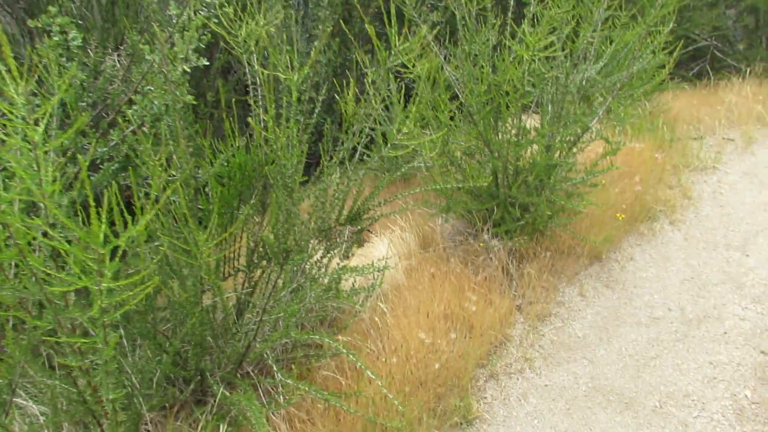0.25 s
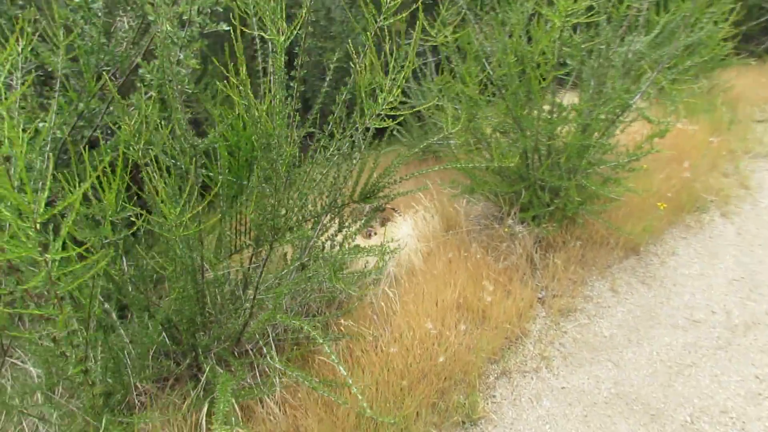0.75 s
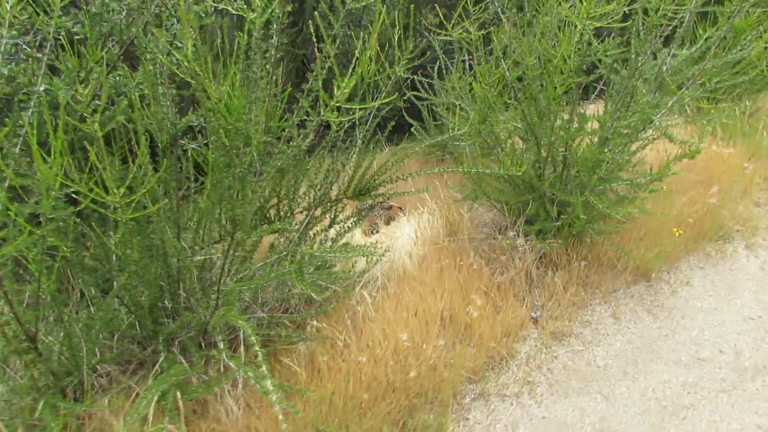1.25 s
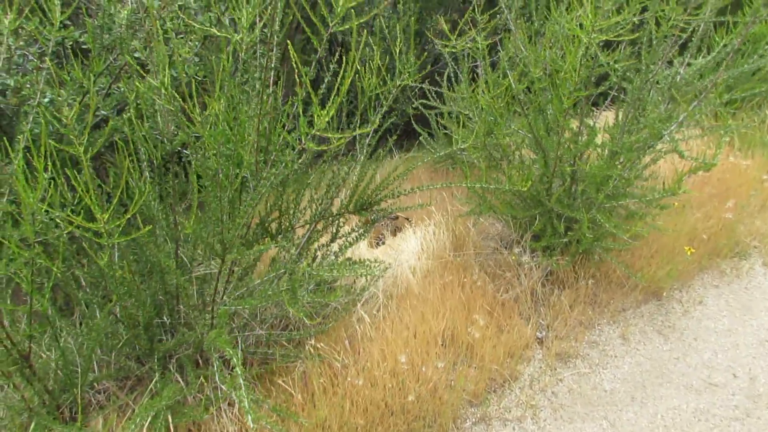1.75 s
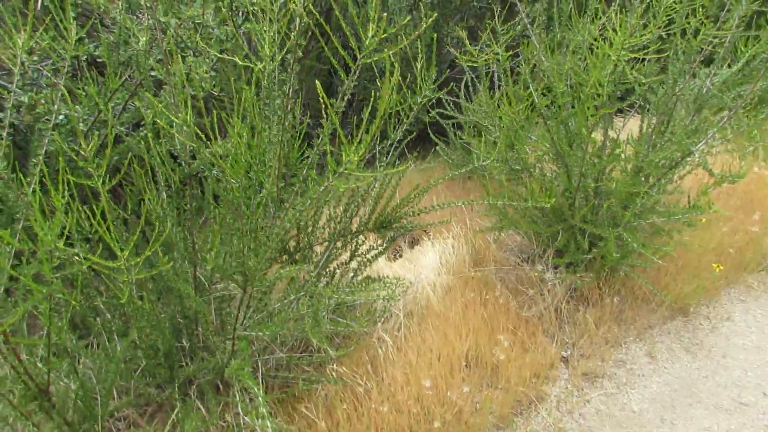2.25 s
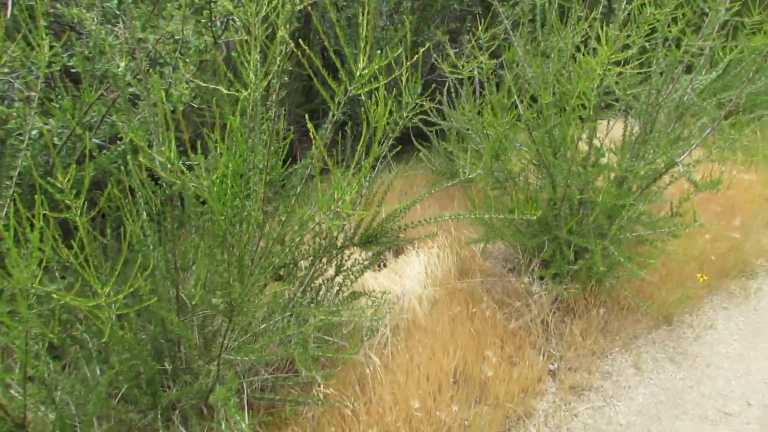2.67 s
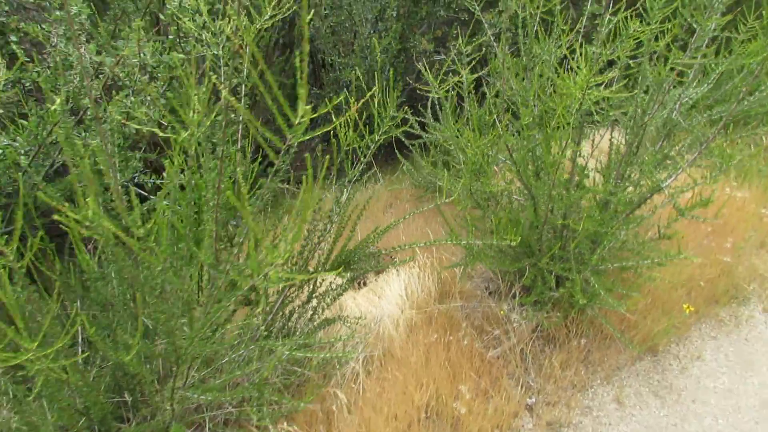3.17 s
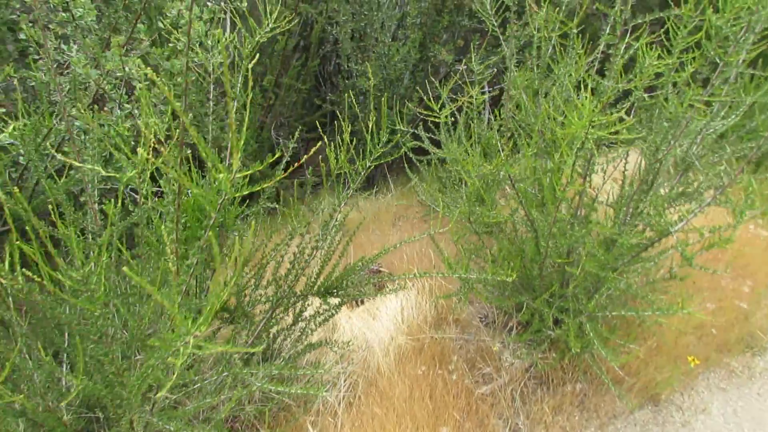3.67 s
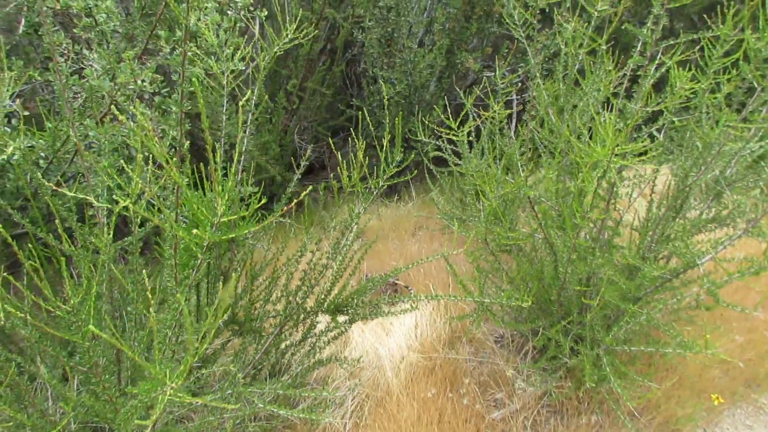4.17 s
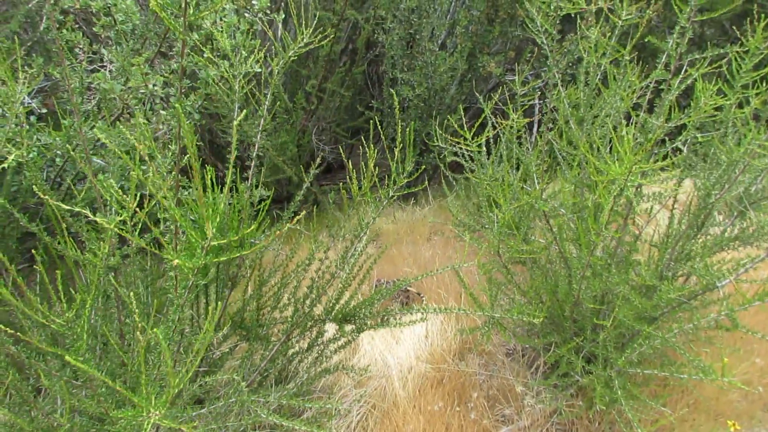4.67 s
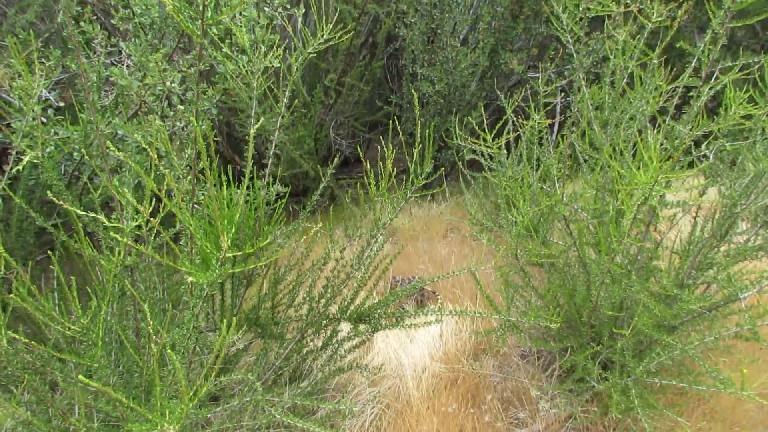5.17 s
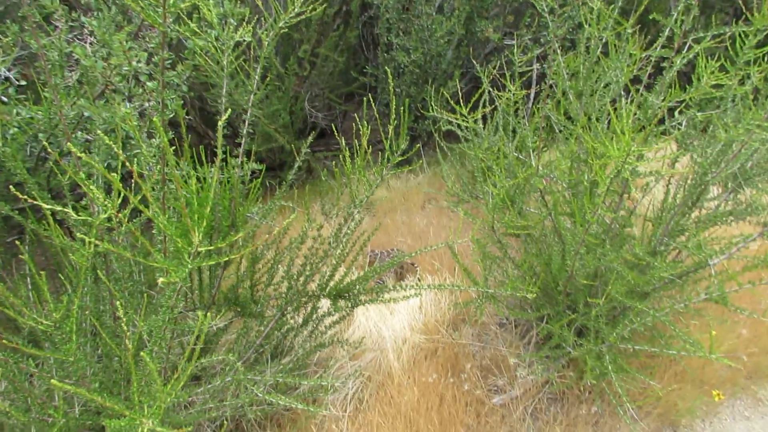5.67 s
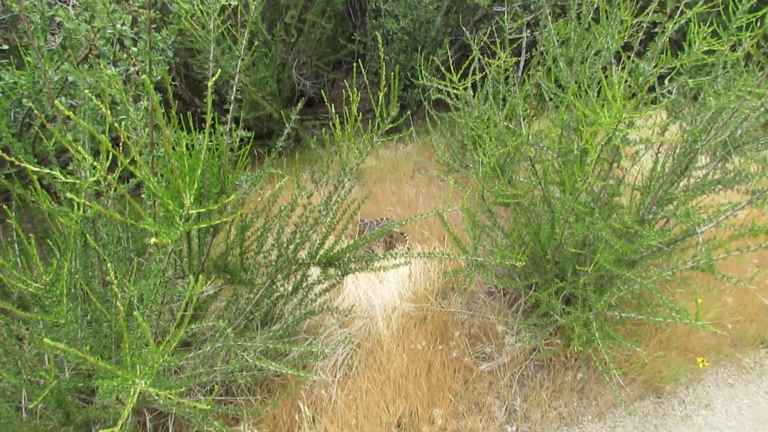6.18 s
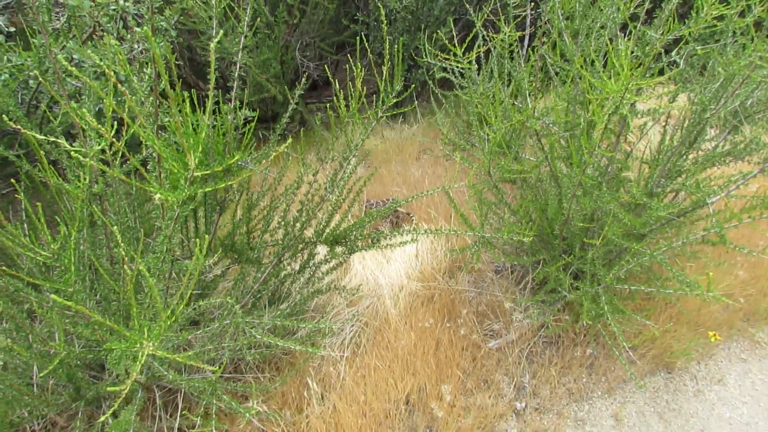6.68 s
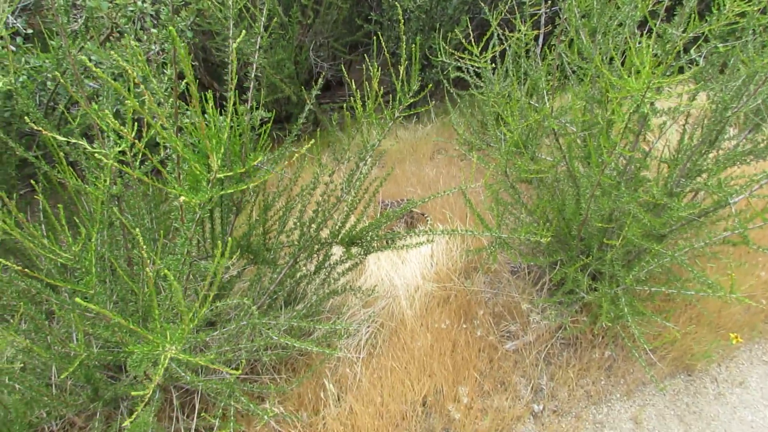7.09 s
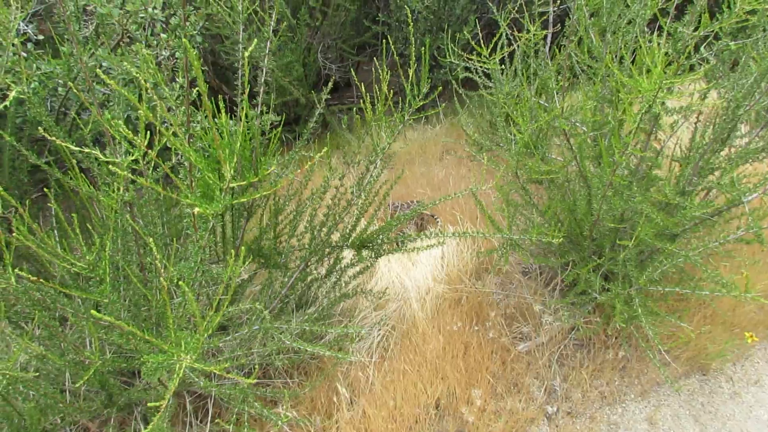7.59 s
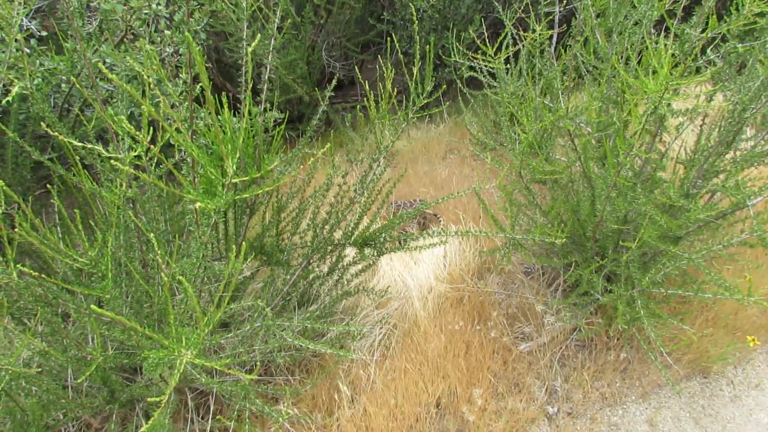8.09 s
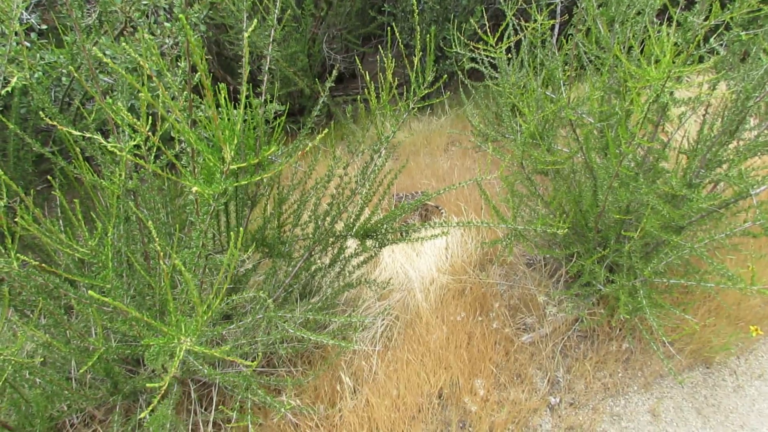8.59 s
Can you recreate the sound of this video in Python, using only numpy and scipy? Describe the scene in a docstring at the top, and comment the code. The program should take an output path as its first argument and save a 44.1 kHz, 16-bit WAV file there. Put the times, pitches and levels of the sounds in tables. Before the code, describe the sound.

The continuous dry, high buzz of a rattlesnake's tail over faint outdoor air, with a few quick clicks near the microphone.

```python
"""A rattlesnake buzzes its tail without a break in dry brush beside a track.
The tail swings some 56 times a second; at each turn the hollow segments clatter and ring.
Their colour brightens as the posture changes; brush, ground and stems scatter the sound.
A faint outdoor wash lies below. About 2 s in, a camera body clicks in the hand."""
import sys
import numpy as np
from scipy import signal
from scipy.fft import rfft, irfft
from scipy.io import wavfile

SR = 44100
rng = np.random.default_rng(int(sys.argv[2]) if len(sys.argv) > 2 else 0)


def unload_audio(sound):
    """Save the sound as a 16-bit wav file, at the path given as the first command line argument."""
    columns = np.transpose(np.atleast_2d(sound))
    # keep every value between -1 and 1, then stretch to whole-number steps
    steps = np.round(np.clip(columns, -1, 1) * 32767)
    wavfile.write(sys.argv[1], SR, steps.astype(np.int16))


N = 389403
TIME_S = np.arange(N) / SR
BIN_HZ = np.fft.rfftfreq(N, 1 / SR)

# The tail speeds up, then tires. Each row: time in seconds, full swings per second.
SWING_HZ = [(0, 55.3), (1.7, 57.1), (5.1, 56.3), (7.7, 54.3), (8.8, 53.9)]
# Rattling force surges as the snake shifts, then grows. Each row: time in seconds, relative level in dB.
FORCE_DB = [(0, -31.0), (3.1, -30.5), (3.3, -29.9), (3.7, -29.5), (4.0, -30), (5.1, -30), (6.3, -29),
            (8.83, -28.5)]
# Timing spread of the knocks. Each row: time in seconds, spread as a share of one stroke.
SCATTER_STROKES = [(0, .13), (.8, .23), (5.8, .27), (8.8, .13)]
# Ranges of large to small segments. Each entry: centre in Hz.
SEGMENT_CENTRES_HZ = [3000, 5670, 9200, 14400]
# Posture of the rattle. Each row: time in seconds, blend from 0 (first posture) to 1 (second).
POSTURE_BLEND = [(0, 0), (1.3, 0.14), (1.8, 0.26), (3.17, 0.56), (3.3, 0.65), (4.3, 0.96), (8.8, 1)]
# Segment resonances in each posture. Each row: centre in Hz, width in Hz, relative level in dB.
FIRST_MODES = [(2390, 240, -8.5), (3750, 680, -6), (4640, 870, 1), (6280, 880, -4.5), (7770, 1600, -6),
               (9500, 800, -5), (12440, 1800, -6.5), (14900, 690, -5)]
SECOND_MODES = [(2620, 820, -13.5), (3657, 704, -4.5), (4760, 450, -6), (6050, 810, 1), (6800, 1050, -3.5),
                (9300, 2000, -7.5), (12870, 1100, -4.5), (15800, 2100, -5.5)]
# Sharp shell rings in either posture. Each row: centre in Hz, width in Hz, relative level in dB.
SHELL_MODES = [(3810, 110, -10.5), (4720, 130, -7), (6217, 47, 1), (9300, 220, -6.5)]
# Cancellations in the second posture. Each row: centre in Hz, 1/e half-width in Hz, gain in dB.
SHELL_DIPS = [(4180, 180, -2), (8450, 490, -1), (14450, 280, -3)]
# Directional lobes. Each row: centre in Hz, 1/e half-width in Hz, posture (0-1), gain there in dB.
POSTURE_LOBES = [(2400, 630, 0.12, -4.5), (2500, 470, 0.53, 2), (9500, 650, 0.46, -2.5),
                 (11300, 700, 0.5, 2)]
# The top treble comes and goes. Each row: time in seconds, band gain in dB.
TOP_TREBLE_DB = [(0, -2), (2.65, 2.5), (3.05, -1), (4.1, -8), (6.2, -2.5), (6.9, -7), (8.8, -8)]
# The snake drifts sideways. Each row: time in seconds, added left minus right in dB.
PAN_DB = [(0, 1.3), (8.8, .3)]
# Spectrum of the wash. Each row: frequency in Hz, relative density in dB.
WASH_SPECTRUM_DB = [(8.8, -39), (15, -9.5), (59, 0.5), (97, -3), (238, -5), (574, -9), (764, -8),
                    (1880, -16.5), (2000, -18), (2600, -16.5), (4400, -120)]
# The wash rises and falls once. Each row: time in seconds, gain in dB.
BREEZE_DB = [(0, -1.2), (1.5, 0.16), (5.2, 0.54), (8.8, -0.7)]
# Phase between the two microphone ports. Each row: frequency in Hz, lead of the left in radians.
RATTLE_LEAD_RAD = [(2700, 0.2), (3500, 0.93), (4300, -0.089), (5000, -0.34), (5600, -0.84), (6500, 0.2),
                   (9300, -0.58), (13000, -0.2), (15000, -0.7)]
WASH_LEAD_RAD = [(50, 0.61), (170, 1.34), (350, 0.95), (800, 1.22), (1100, 2.12), (1800, 1.89)]
# Balance between the ports. Each row: frequency in Hz, left minus right in dB.
RATTLE_SIDE_DB = [(2300, -2.5), (3100, -5), (3900, 3.5), (4800, -1.5), (5300, 3.5), (6000, -4),
                  (7000, -0.5), (15000, -1)]
WASH_SIDE_DB = [(60, -2), (110, -3), (200, 0), (380, 1.0), (700, 4.0), (1290, 6), (2380, 3), (4400, 0.5),
                (8120, -1.0), (15000, 0.0)]
# Likeness of the ports. Each row: frequency in Hz, coherence from 0 to 1.
RATTLE_COHERENCE = [(2000, 1), (3500, 0.85), (7000, 0.96), (10000, 0.91), (11000, 0.66), (13000, 0.88),
                    (15000, 0.61)]
WASH_COHERENCE = [(50, .5), (150, 0.39), (400, 0.57), (850, 0.63), (1400, 0.54), (2000, 0.99)]
# Slips and taps on the camera body. Each row: start in seconds, relative peak in dB.
BODY_CLICKS = [(2.01, -25), (2.013, -18), (2.021, -15.5), (2.0277, -21), (2.0348, -28), (2.061, -32),
               (2.174, -23.5), (2.225, -28), (2.239, -27)]
# Modes of that body. Each row: frequency in Hz, relative level in dB, 60 dB decay time in seconds.
BODY_MODES = [(810, -3, 0.0091), (1430, -7, 0.0043), (1650, 1, 0.017), (2160, 6.5, 0.0061),
              (2500, -17, 0.008)]


def gain_of(db):
    """Decibels to amplitude gain."""
    return 10 ** (np.asarray(db) / 20)


def unit_rms(x):
    """Scales to rms 1."""
    return x / np.sqrt(np.mean(x ** 2) + 1e-20)


def curve(rows, time_s=TIME_S):
    """Interpolates a control curve over time."""
    return np.interp(time_s, *np.transpose(rows))


def spectrum(rows):
    """Interpolates onto the FFT bins, in log frequency."""
    hz, value = np.transpose(rows)
    return np.interp(np.log(BIN_HZ + 1), np.log(hz + 1), value)


def bell(x, centre, width):
    """Gaussian: 1 at the centre, 1/e one width away."""
    return np.exp(-((x - centre) / width) ** 2)


def wander(top_hz):
    """Slow drift of rms 1: a sum of sines with random phases."""
    coarse_s = TIME_S[::200]
    hz = np.geomspace(top_hz / 8, top_hz, 12)[:, None]
    waves = np.sin(2 * np.pi * (hz * coarse_s + rng.random(hz.shape)))
    return unit_rms(np.interp(TIME_S, coarse_s, waves.sum(0)))


def tail_turns(spread_db=0.41, backstroke_db=-1.5, jitter_s=.0003, rate_drift=.004):
    """Times and strengths of the two turns in each swing; the backstroke is weaker."""
    swing_hz = curve(SWING_HZ) * (1 + rate_drift * wander(top_hz=6))
    strokes = 2 * np.cumsum(swing_hz) / SR
    turn_s = TIME_S[np.flatnonzero(np.diff(np.floor(strokes), prepend=-1))][:, None]
    late, strong = rng.standard_normal((2, len(turn_s), 1))
    backstroke = (np.arange(len(turn_s)) % 2)[:, None]
    return turn_s + jitter_s * late, gain_of(spread_db * strong + backstroke_db * backstroke)


def clatter(turn_s, strength, count=9, spread_db=3.5, scrape_db=-3, scrape_s=0.00099, jostle_db=-2.0):
    """Segments knock and scrape around each turn, and jostle loosely throughout."""
    offset = rng.laplace(0, 1, (len(turn_s), count))
    knock_s = turn_s + offset * curve(SCATTER_STROKES, turn_s) / (2 * curve(SWING_HZ, turn_s))
    # The knocks share one stroke's energy.
    share = gain_of(spread_db * np.minimum(rng.standard_normal(offset.shape), 1.5))
    force = strength * share / np.linalg.norm(share, axis=1, keepdims=True)
    force *= rng.choice([-1, 1], force.shape)
    index = np.round(knock_s * SR).astype(int).ravel() % N
    knocks = unit_rms(np.bincount(index, force.ravel(), N))
    jostle = unit_rms(rng.standard_normal(N) * (rng.random(N) < 6000 / SR))  # about 6000 ticks/s
    return unit_rms(knocks + gain_of(scrape_db) * smear(knocks, scrape_s) + gain_of(jostle_db) * jostle)


def smear(knocks, decay_s):
    """Each knock leaves a puff of noise whose power decays exponentially."""
    power = signal.lfilter([1], [1, -np.exp(-1 / (decay_s * SR))], knocks ** 2)
    return unit_rms(np.sqrt(power) * rng.standard_normal(N))


def segment_knocks(together_db=-4):
    """Each size of segment clatters in its own range; some knocks shake the whole string."""
    turn_s, strength = tail_turns()
    bands = (spectrum(list(zip(SEGMENT_CENTRES_HZ, row))) for row in np.eye(len(SEGMENT_CENTRES_HZ)))
    apart = irfft(sum(rfft(clatter(turn_s, strength)) * np.sqrt(band) for band in bands), N)
    return unit_rms(apart + gain_of(together_db) * clatter(turn_s, strength))


def early_echoes(x, echo_db=-13, longest_s=.009, sway_s=.00009, count=8):
    """Adds weak echoes from ground and stems; their paths change as the hand sways."""
    lags_s = (lag + sway_s * wander(top_hz=0.48) for lag in rng.uniform(0.000995, longest_s, count))
    echoes = sum((-1) ** k * np.interp(TIME_S - lag, TIME_S, x) for k, lag in enumerate(lags_s))
    return x + gain_of(echo_db) * unit_rms(echoes)


def shell_ring(knocks, modes, taps=2048, low_hz=2200):
    """Knocks ring the resonances of the small hollow shells, which radiate no bass."""
    hz = abs(np.fft.fftfreq(taps, 1 / SR)) + 1
    power = sum(gain_of(db) ** 2 / (1 + (np.sqrt(2) - 1) * (2 * (hz - centre_hz) / width_hz) ** 2) ** 2
                for centre_hz, width_hz, db in modes)
    power = np.maximum(power / (1 + (low_hz / hz) ** 16), 1e-8)
    minimum_phase = np.exp(np.conj(signal.hilbert(np.log(power) / 2)))
    return unit_rms(signal.oaconvolve(knocks, np.fft.ifft(minimum_phase).real)[:N])


def shell_dips(x):
    """Sound from opposite sides of the shells partly cancels in narrow bands."""
    dips_db = sum(db * bell(BIN_HZ, hz, width_hz) for hz, width_hz, db in SHELL_DIPS)
    return unit_rms(irfft(rfft(x) * gain_of(dips_db), N))


def mic_ports(direct, diffuse, coherence, lead_rad, side_db):
    """Two ports share the direct sound and get the diffuse part in opposite signs; mid rms is 1."""
    likeness = np.clip(spectrum(coherence), 0, 1)
    shared = rfft(direct) * np.sqrt(1 + likeness)
    apart = rfft(diffuse) * np.sqrt(1 - likeness)
    lean = gain_of(spectrum(side_db) / 2) * np.exp(.5j * spectrum(lead_rad))
    spectra = np.array([(shared + apart) * lean, (shared - apart) / lean])
    mid_power = (1 + likeness) * abs(lean + 1 / lean) ** 2 + (1 - likeness) * abs(lean - 1 / lean) ** 2
    pair = irfft(spectra / np.sqrt(mid_power), N)
    return pair / pair.mean(0).std()


def band_change(pair, hz, width_hz, db):
    """Signal to add so that one band follows the gain curve db."""
    return (gain_of(db) - 1) * irfft(rfft(pair) * bell(BIN_HZ, hz, width_hz), N)


def shifting_colour(pair, posture, lobe_spread=0.25):
    """Lobes sweep past as the rattle turns, force brightens it, and the top treble comes and goes."""
    lobes = sum(band_change(pair, hz, width_hz, db * bell(posture, facing, lobe_spread))
                for hz, width_hz, facing, db in POSTURE_LOBES)
    force_db = curve(FORCE_DB)
    high_ring = band_change(pair, hz=12900, width_hz=1000, db=-0.5 + 0.99 * (force_db - force_db.mean()))
    top_treble = band_change(pair, hz=15300, width_hz=950, db=curve(TOP_TREBLE_DB))
    return pair + lobes + high_ring + top_treble


def rattle(brush_db=-7, brush_s=0.011, trim_db=0.28):
    """The clatter rings the hollow segments, coloured by posture and scattered by the brush."""
    knocks = segment_knocks()
    near = early_echoes(knocks + gain_of(brush_db) * smear(knocks, brush_s))
    scattered = smear(knocks, brush_s)
    posture = np.clip(curve(POSTURE_BLEND), 0, 1)
    first, second = np.vstack([FIRST_MODES, SHELL_MODES]), np.vstack([SECOND_MODES, SHELL_MODES])
    direct, diffuse = ((1 - posture) * shell_ring(x, first) + posture * shell_dips(shell_ring(x, second))
                       for x in (near, scattered))
    pair = mic_ports(direct, diffuse, RATTLE_COHERENCE, RATTLE_LEAD_RAD, RATTLE_SIDE_DB)
    pan_db = np.outer([.5, -.5], curve(PAN_DB))
    return gain_of(curve(FORCE_DB) + trim_db + pan_db) * shifting_colour(pair, posture)


def outdoor_wash(base_db=-44):
    """Dull noise of distant air and foliage."""
    noise = rng.standard_normal((2, N))
    direct, diffuse = irfft(rfft(noise) * gain_of(spectrum(WASH_SPECTRUM_DB)), N)
    pair = mic_ports(direct, diffuse, WASH_COHERENCE, WASH_LEAD_RAD, WASH_SIDE_DB)
    return gain_of(base_db + curve(BREEZE_DB)) * pair


def camera_clicks(left_db=4.0, right_db=-3, right_lag_s=0.000063, band_hz=(700, 3000)):
    """Quick slips and a few light taps ring the plastic body, nearer the left port."""
    start_s, peak_db = np.transpose(BODY_CLICKS)
    blows = np.bincount(np.round(start_s * SR).astype(int), gain_of(peak_db), N)
    age_s = np.maximum(TIME_S[:SR // 20] - np.array([[0], [right_lag_s]]), 0)
    ring = sum(gain_of(db - 60 * age_s / t60_s) * np.sin(2 * np.pi * hz * age_s)
               for hz, db, t60_s in BODY_MODES)
    # The small, damped body passes neither bass nor treble.
    ring = signal.sosfilt(signal.butter(2, band_hz, "band", fs=SR, output="sos"), ring)
    clicks = signal.oaconvolve(blows[None], ring / abs(ring).max(), axes=1)[:, :N]
    return gain_of([[left_db], [right_db]]) * clicks


def scene():
    """Snake, outdoor wash and handling clicks, in stereo."""
    return rattle() + outdoor_wash() + camera_clicks()


def record(dry):
    """Steep low-pass; cutoff in Hz."""
    lowpass = signal.firwin(1023, cutoff=15780, window=("kaiser", 9), fs=SR)
    return signal.oaconvolve(dry, lowpass[None], "same")


dry = scene()
out = record(dry)
unload_audio(out)
```